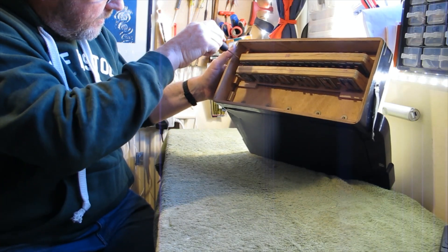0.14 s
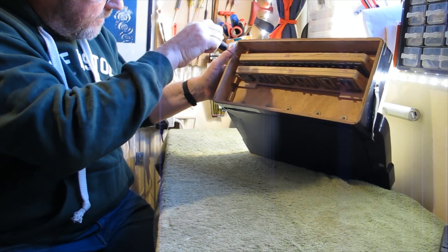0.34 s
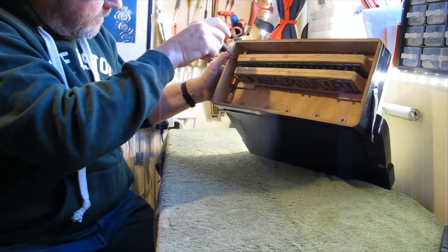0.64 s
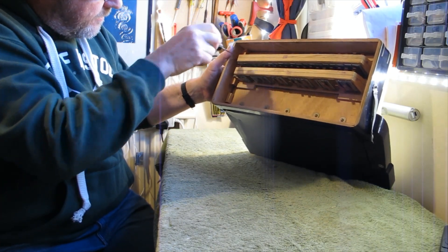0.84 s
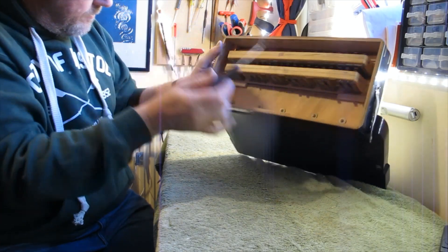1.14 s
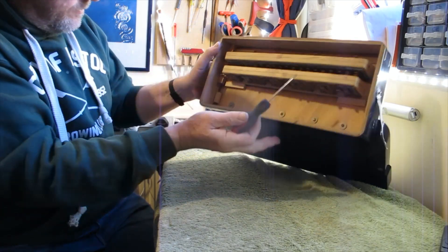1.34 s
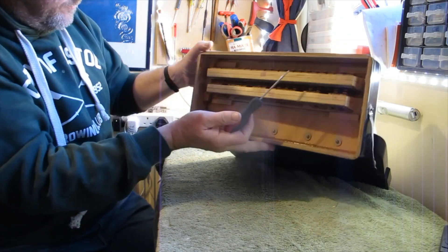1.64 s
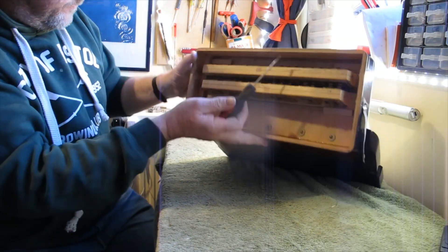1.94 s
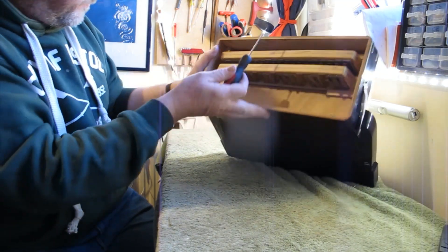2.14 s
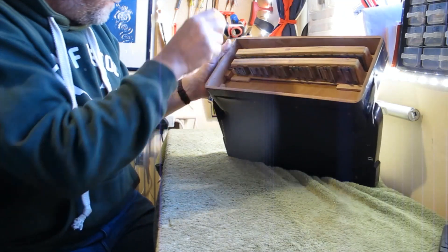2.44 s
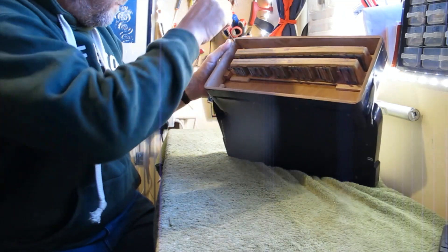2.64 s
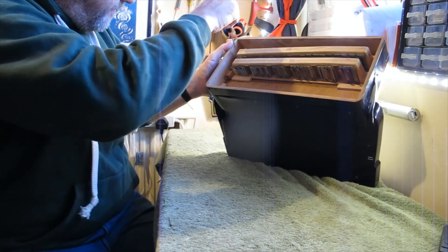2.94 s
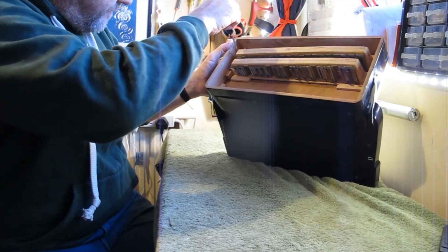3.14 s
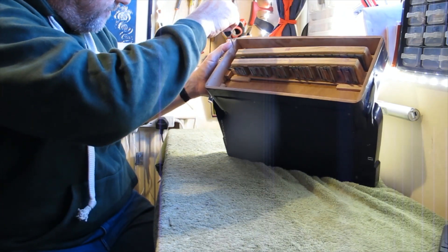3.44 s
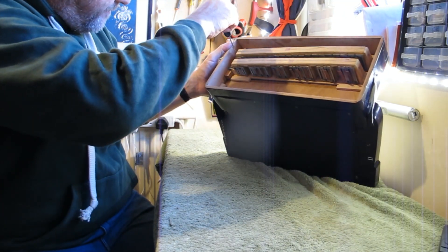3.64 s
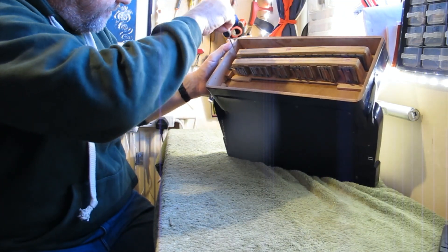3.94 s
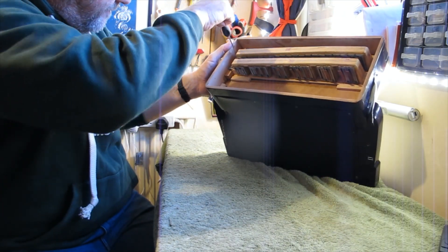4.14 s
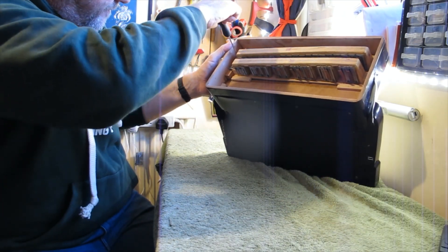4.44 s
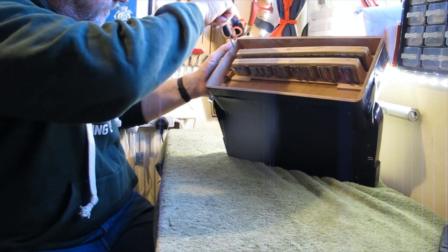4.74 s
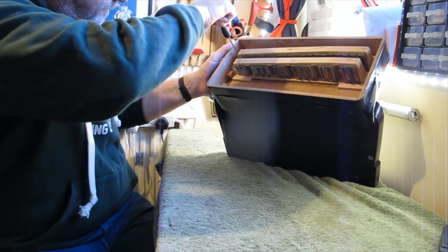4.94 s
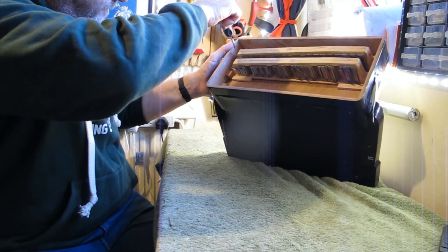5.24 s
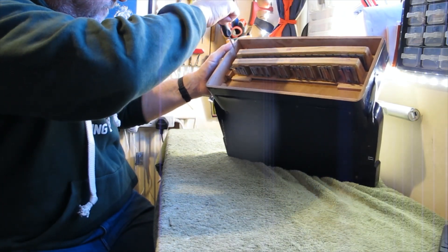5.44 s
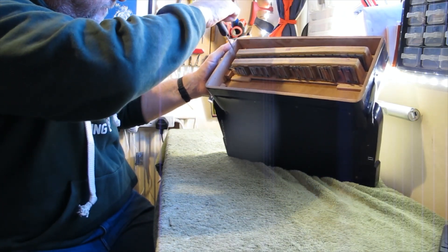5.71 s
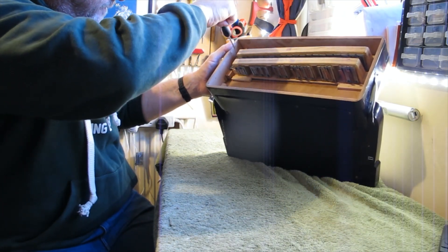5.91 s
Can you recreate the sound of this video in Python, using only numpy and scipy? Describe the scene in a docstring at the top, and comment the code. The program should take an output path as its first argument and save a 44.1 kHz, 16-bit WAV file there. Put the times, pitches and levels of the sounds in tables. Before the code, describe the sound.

A small screwdriver works a stiff screw in a wooden case, and the screw lets go with a loud snap. The hollow case bumps and drags on a cloth-covered bench amid light ticks, then comes another sharp click. Sparser knocks of steel on wood follow, with soft thumps and a few faint squeaks. A microphone to one side picks it up over the low rumble and hiss of a quiet workshop.

```python
"""A small screwdriver works a stiff screw at the corner of a wooden case in a quiet workshop. The screw
snaps loose, the case bumps and drags round on a cloth-covered bench, then the blade ticks and knocks,
ringing wood and steel; its tip squeaks in the slot. A camera to one side hears it over room rumble and
hiss; its gain control ducks after the loudest snap."""
import sys
import numpy as np
from scipy import signal
from scipy.fft import rfft, irfft, next_fast_len
from scipy.io import wavfile
from scipy.ndimage import uniform_filter1d, minimum_filter1d

SR = 44100
rng = np.random.default_rng(int(sys.argv[2]) if len(sys.argv) > 2 else 0)


def wav_out(sig):
    """Save sig, one row per channel (or a flat mono array), as 16-bit PCM at SR to the path in sys.argv[1]."""
    wavfile.write(sys.argv[1], SR, np.round(np.clip(np.atleast_2d(sig).T, -1, 1) * 32767).astype(np.int16))


N = 267687


def amp(db):
    return 10 ** (np.asarray(db) / 20)


def unit(x):
    return x / np.sqrt(np.mean(x ** 2) + 1e-20)


def curve_at(points, hz):
    """Interpolate (f/Hz, value) points over log frequency."""
    f, value = np.transpose(points)
    return np.interp(np.log(hz + 1), np.log(f + 1), value)


def add(mix, start_s, sound):
    part = mix[round(start_s * SR):][:len(sound)]
    part += sound[:len(part)]


def panned(left_minus_right_db):
    return amp(np.array([[.5], [-.5]]) * left_minus_right_db)


def room_tone():
    """Lumpy rumble, steady hiss and two faint whines; the noise differs at each microphone port."""
    spectrum = [(10, -4.5), (22, -3.5), (35, -8.5), (64, -19), (100, -2), (125, -14), (180, -15),
                (300, -22), (700, -22), (2100, -27), (3400, -29), (7000, -30), (9000, -33.5), (16000, -40)]  # noise: f/Hz, relative density/dB
    likeness = [(60, 0.92), (180, 0.59), (550, 0.04), (1650, 0.088), (4970, 0.03), (15000, 0.045)]  # f/Hz, left-right correlation
    balance = [(60, -9), (180, -2.5), (550, -3.5), (1650, -1.5), (4970, -0.5), (15000, -2)]  # f/Hz, left minus right/dB
    whines = [(2690, -81), (8802, -79)]  # steady tones: f/Hz, level/dB
    noise_db = -52.5
    frames, hz = N // 1024 + 5, np.fft.rfftfreq(4096, 1 / SR)
    a, b, c, d, lumps = rng.standard_normal((frames, 2049, 5)).T
    lumps = unit(uniform_filter1d(uniform_filter1d(lumps, 12, 0), 4, 1))
    wander_db = (0.07 + 2.0 / (1 + hz[:, None] / 300)) * lumps
    same = curve_at(likeness, hz)[:, None]
    left = a + 1j * b
    right = same * left + np.sqrt(1 - same ** 2) * (c + 1j * d)
    z = np.array([left, right]) * amp(curve_at(spectrum, hz)[:, None] + wander_db)
    z *= panned(curve_at(balance, hz))[:, :, None]
    noise = signal.istft(z, nperseg=4096, noverlap=3072)[1][:, :N]
    whine = sum(amp(db) * np.sin(2 * np.pi * f * np.arange(N) / SR) for f, db in whines)
    return amp(noise_db) * unit(noise) + whine


def workshop_echoes(x):
    """Sparse reflections of random sign, separate per port, each band dying at its own rate."""
    decay = [(300, 0.086), (1500, 0.12), (5000, 0.12), (12000, 0.069)]  # room: f/Hz, t60/s
    taps = np.zeros((2, 12000))
    delays = np.arange(200, 11960, 20) + rng.integers(0, 20, (2, 588))
    np.put_along_axis(taps, delays, rng.choice([-1., 1.], delays.shape), 1)
    hz, t, z = signal.stft(taps, SR, nperseg=128)
    tail = signal.istft(z * amp(-60 * t / curve_at(decay, hz)[:, None]), SR, nperseg=128)[1]
    return signal.fftconvolve(x[None], tail / np.linalg.norm(tail[0]), axes=1)[:, :N]


def cloth_slide():
    """Case, sleeves and hands slide on cloth; fibres catch and let go as patchy, grainy noise."""
    strokes = [(0, -61.5), (.4, -78), (.5, -48.5), (.62, -60), (.72, -78), (1.06, -56.5), (1.1, -50),
               (1.19, -45), (1.23, -48), (1.27, -60.5), (1.42, -61.5), (1.5, -48), (1.79, -51),
               (2.15, -49.5), (2.33, -53), (2.38, -48), (2.51, -51.5), (2.6, -51.5), (2.63, -60),
               (2.84, -57.5), (3, -71), (6.06, -67.5)]  # sliding envelope: t/s, relative level/dB
    scuffs = [(0.751, 0.0083, -42, -12.5), (.773, 0.0089, -36.5, 6.5), (1.358, 0.035, -54.5, -6),
              (1.51, 0.037, -45.5, -19), (1.561, 0.0088, -36.5, 6.5), (1.614, 0.0083, -42, -2),
              (1.706, 0.024, -40.5, 0), (1.832, 0.027, -53.5, 0), (1.931, 0.017, -48, -21),
              (2.04, 0.048, -52.5, -1.5), (2.117, 0.023, -43, -7), (2.192, 0.012, -41.5, -4),
              (2.237, 0.02, -37.5, -1), (2.3, 0.02, -51, -26), (2.887, 0.023, -47.5, -17),
              (3.688, 0.022, -42.5, -15.5), (4.41, 0.039, -50.5, -14.5), (4.626, 0.016, -43.5, -30),
              (4.968, 0.028, -50.5, 1), (5.06, 0.056, -60, -8), (5.67, 0.064, -55, -13),
              (5.8, 0.065, -57.5, -14)]  # brief swells: centre t/s, half width/s, relative level/dB, treble offset/dB
    spectrum = [(88, -37.5), (150, 4), (401, -15.5), (441, -18), (495, -14), (802, 0.5), (918, -2),
                (1160, 1.5), (1250, -5.5), (2100, -4), (2750, -6), (4600, -2), (7080, -4), (9300, -24),
                (15000, -41.5)]  # friction: f/Hz, relative density/dB
    grain_db, patch_db, stroke_treble_db = 1.9, 3.15, -2
    frames, hz = N // 64 + 5, np.fft.rfftfreq(256, 1 / SR)
    t = np.arange(frames) * 64 / SR
    grain = rng.standard_normal(N + 512)
    grain *= amp(grain_db * unit(uniform_filter1d(rng.standard_normal(N + 512), 60)))
    z = signal.stft(grain, nperseg=256, noverlap=192)[2][:, :frames]
    patches = unit(uniform_filter1d(uniform_filter1d(rng.standard_normal(z.shape), 4, 0), 25, 1))
    treble = np.clip(np.log2(hz / 2500 + 1e-9) + .5, 0, 1)[:, None]  # 0 to 1 over an octave
    force = amp(np.interp(t, *np.transpose(strokes)) + treble * stroke_treble_db)
    for centre_s, half_s, db, treble_db in scuffs:
        force += amp(db + treble * treble_db) * np.exp(-((t - centre_s) / half_s) ** 2)
    z = z * force * amp(curve_at(spectrum, hz)[:, None] + patch_db * np.clip(patches, -2, 2))
    return amp(8.5) * signal.istft(z, nperseg=256, noverlap=192)[1][:N]


def case_bumps():
    """The hollow case hits the bench: low boom, weaker and shorter overtone, dry thud."""
    bumps = [(.248, -45, 90), (0.497, -31, 109), (.759, -32.5, 106.5), (1.668, -26, 79.6),
             (1.705, -29.5, 122.4), (1.74, -33.5, 70.6), (1.776, -37, 48.4), (2.179, -39.5, 102),
             (2.575, -35, 142), (2.813, -27.5, 105), (3.669, -41, 114.5), (4.263, -41, 95.5),
             (4.389, -42, 136.5), (4.608, -38.5, 112), (4.96, -38, 118), (4.979, -38.5, 138),
             (5.049, -38, 98), (5.283, -42, 120), (5.801, -45.5, 109.5)]  # t/s, level/dB, f/Hz
    overtone_ratio, overtone_db, attack_s = 2.7, -13.0, 0.0023
    thud_hz, thud_db = (150, 445), -9.5
    boom_t60_s, thud_t60_s = 0.14, .05
    out, t = np.zeros(N), np.arange(SR // 2) / SR
    band = signal.butter(N=2, Wn=thud_hz, btype="band", fs=SR, output="sos")
    fall_db = -60 * t / boom_t60_s
    attack = 1 - np.exp(-t / attack_s)
    for start_s, db, hz in bumps:
        boom = amp(fall_db) * np.sin(2 * np.pi * hz * t)
        overtone = amp(overtone_db + 1.4 * fall_db) * np.sin(2 * np.pi * overtone_ratio * hz * t)
        noise = unit(signal.sosfilt(band, rng.standard_normal(len(t))))
        thud = amp(thud_db - 60 * t / thud_t60_s) * noise
        add(out, start_s, -amp(db) * attack * (boom + overtone + thud))
    return out


def tip_squeaks():
    """Stick-slip of the tip in the slot: steady pitch, wavering level."""
    squeaks = [(2.612, .07, 2620, -60), (4.937, .05, 4020, -55), (5.48, .025, 2100, -61),
               (3.25, .045, 1700, -59), (3.25, .05, 2550, -62)]  # t/s, length/s, f/Hz, level/dB
    out = np.zeros(N)
    for start_s, length_s, hz, db in squeaks:
        t = np.arange(round(length_s * SR)) / SR
        waver = 1 + 0.18 * unit(uniform_filter1d(rng.standard_normal(4000), 200))[:len(t)]
        fade = signal.windows.tukey(len(t), .25)
        add(out, start_s, amp(db) * waver * fade * np.sin(2 * np.pi * hz * t))
    return out


def ring(modes, spot_hz, max_t60_s, scatter_db, slope_db_oct):
    """Dying sines; modes near the touched spot's pitch answer most, the hand shortens the long ones."""
    t = np.arange(3000) / SR
    hz, db, t60_s = np.transpose(modes)[:, :, None]
    db = db + scatter_db[:len(hz), None] - slope_db_oct * abs(np.log2(hz / spot_hz))
    return (amp(db - 60 * t / np.minimum(t60_s, max_t60_s)) * np.sin(2 * np.pi * hz * t)).sum(0)


def blade_contacts():
    """Each contact is a blow and a burst of slips: wood and steel ring, with a dry crack at each spot."""
    # t/s, wood level/dB, wood spot f/Hz, steel level/dB, steel spot f/Hz, nominal hand-damped t60/s
    contacts = [(0.495, -13, 600, -36.5, 4350, 0.054), (0.4974, -12, 1674, -23, 4400, 0.069),
                (0.5024, -12, 580, -20, 4500, 0.027), (0.5065, -29, 930, -11, 5130, 0.13),
                (.513, -35, 1030, -18.5, 5700, 0.047), (.609, -40, 2260, -42.5, 3640, 0.037),
                (.77, -33.5, 2260, -34.5, 4250, 0.06), (1.105, -44.5, 2025, -56, 4350, 0.082),
                (1.25, -64, 1040, -47, 4790, .05), (1.315, -32, 1160, -38.5, 6440, 0.043),
                (1.34, -41, 1290, -45.5, 3860, 0.059), (1.354, -42.5, 1570, -41.5, 4350, 0.056),
                (1.393, -54, 2800, -48.5, 6750, 0.041), (1.453, -50, 2080, -55, 4000, 0.055),
                (1.493, -31.5, 2300, -34, 3980, .1), (1.551, -31.5, 1940, -19.5, 6200, 0.048),
                (1.596, -41.5, 1390, -61, 5000, 0.17), (1.62, -38, 1250, -49, 4400, 0.064),
                (1.67, -46, 1290, -56, 3700, 0.081), (1.69, -40.5, 1510, -36, 5540, 0.12),
                (1.718, -40, 1750, -39, 6940, 0.04), (1.888, -40.5, 3240, -31, 6620, .06),
                (1.98, -39.5, 1900, -61, 4430, 0.068), (2.085, -28.5, 1300, -41, 5300, 0.085),
                (2.089, -25, 1180, -38, 4470, 0.037), (2.104, -33.5, 1340, -49, 4700, 0.18),
                (2.178, -35.5, 1880, -19, 6100, .03), (2.204, -35.5, 1540, -42, 6700, 0.039),
                (2.221, -13.5, 2870, -12, 4200, 0.027), (2.2225, -19, 1830, -17, 3580, 0.019),
                (2.232, -33, 1700, -42, 6900, 0.073), (2.246, -36, 2570, -35, 4400, 0.027),
                (2.287, -40, 1430, -36.5, 4600, 0.057), (2.3, -34, 2300, -34.5, 4130, 0.04),
                (2.434, -45.5, 1580, -59, 6000, 0.055), (2.573, -36.5, 676, -54, 5190, 0.11),
                (2.81, -35.5, 707, -62, 3700, 0.041), (2.879, -46.5, 1880, -56, 4350, 0.05),
                (3.231, -41.5, 1580, -54, 3970, 0.18), (3.242, -41, 2100, -50, 3800, 0.025),
                (3.663, -29.5, 910, -33, 4720, 0.042), (3.67, -37, 2420, -27, 4540, 0.037),
                (3.839, -48.5, 1080, -69, 4500, 0.046), (3.911, -54.5, 1070, -70, 5750, 0.085),
                (4.01, -47, 1000, -56, 5500, 0.047), (4.263, -51.5, 643, -71, 5500, 0.097),
                (4.387, -38.5, 1600, -38, 4700, 0.031), (4.603, -25, 782, -43, 5060, 0.042),
                (4.661, -46, 1160, -56, 5500, 0.088), (4.9, -44, 900, -73, 3730, 0.078),
                (4.974, -49.5, 630, -51, 4630, .11), (5.278, -43.5, 860, -60, 4710, 0.25),
                (5.685, -36, 1900, -36.5, 4600, 0.032), (5.8, -54, 656, -57, 6000, 0.077),
                (5.969, -54.5, 990, -67, 7110, 0.099)]
    # modes: f/Hz, relative level/dB, t60/s
    walls = [(592, 2, .06), (700, -2, .035), (800, -2, .035), (925, 0, .04), (1067, 0, .04),
             (1190, -3, .03)]
    slats = [(1415, 0, .035), (1560, -2, .03), (1730, 0, .04), (1845, 0, .03), (2080, 0, .03),
             (2200, -2, .03), (2570, 0, .03), (2810, -3, .025), (3100, -4, .02), (3350, -4, .02)]
    screw = [(3700, -3, .02), (4020, -2, .025), (4360, 0, .03), (4745, 0, .03), (4950, -4, .02),
             (5125, 0, .03), (5290, -3, .025), (5630, -3, .025), (5770, -1, .03)]
    blade = [(6240, -6, .02), (6620, 0, .04), (6750, -2, .025), (7200, -5, .02), (7900, -14, .02),
             (8850, -8, .03), (10380, -10, .03)]
    # per body: mode falloff/(dB/octave), crack Q, crack re ring/dB, t60 factor, low-pass f / spot f
    responses = [(20.5, 2.3, -4.5, 1.046, 2.1), (26.0, 2.5, -1.5, 0.89, 1.4), (7.96, 0.99, -12, 0.73, 1.9)]
    bodies = [walls + slats, screw + blade, blade]  # wood, screw end, free blade
    free_blade_hz, slip_rise_s = 6150, 0.0018
    bands = [signal.butter(N=4, Wn=edges_hz, btype="band", fs=SR, output="sos")
             for edges_hz in [(470, 3500), (3300, 10800)]]  # wood, steel
    out, t = np.zeros(N), np.arange(2600) / SR
    for start_s, wood_db, wood_hz, steel_db, steel_hz, hand_t60_s in contacts:
        slips = rng.standard_normal(len(t)) * (1 - np.exp(-t / slip_rise_s))
        slips[0] = 2.28  # the blow
        scatter_db = 1.3 * rng.standard_normal((2, 16))
        for material, (db, hz) in enumerate([(wood_db, wood_hz), (steel_db, steel_hz)]):
            body = material + (hz > free_blade_hz)
            slope_db_oct, crack_q, crack_db, t60_factor, cutoff_ratio = responses[body]
            t60_s = t60_factor * np.clip(hand_t60_s, .008, .15)
            burst = slips * amp(-60 * t / (0.41 * t60_s))
            ringing = ring(bodies[body], hz, t60_s, scatter_db[material], slope_db_oct)
            tone = signal.fftconvolve(burst, ringing)[:len(t)]
            peak = signal.iirpeak(hz, crack_q, SR)
            crack = signal.lfilter(*peak, signal.lfilter(*peak, burst))
            knock = signal.sosfilt(bands[material], unit(tone) + amp(crack_db) * unit(crack))
            softness = signal.butter(N=2, Wn=cutoff_ratio * hz, fs=SR)  # a soft contact drives no highs
            knock = signal.lfilter(*softness, knock)
            max_rms = np.sqrt(uniform_filter1d(knock ** 2, 130).max())
            add(out, start_s, amp(db) * knock / max_rms)
    return out


def microphone_ports(x):
    """Bench sound reaches the two ports with unlike level and phase."""
    shading = [(200, 1), (700, 0), (2400, 1), (4400, 6.5), (5800, 3), (6800, -4), (8100, -8), (10500, -2),
               (15000, 1)]  # by the camera body: f/Hz, left minus right/dB
    lead = [(0, 0), (1700, -.2), (2900, -.7), (4300, -1.1), (5500, -2.3), (6550, -2.2), (8000, -.5),
            (10200, 0), (16000, 0)]  # f/Hz, left phase lead/rad
    size = next_fast_len(N + 2048)
    hz = np.fft.rfftfreq(size, 1 / SR)
    phase_rad = np.array([[.5], [-.5]]) * curve_at(lead, hz)
    response = panned(curve_at(shading, hz)) * np.exp(1j * phase_rad)
    return irfft(rfft(x, size) * response, size)[:, :N]


def scene():
    tool_pan, bench_pan = panned(-6.5), panned(-7)
    direct = tool_pan * blade_contacts() + bench_pan * (tip_squeaks() + cloth_slide())
    echoes = amp(-13.0) * bench_pan * workshop_echoes(direct.mean(0))
    return microphone_ports(direct + echoes + bench_pan * case_bumps()) + room_tone()


def record(dry):
    """Gain control ducks after a loud sound, holds and lets go; then input clipping and band limit."""
    threshold_db, max_over_db, duck_db_per_db = -16.5, 3.0, 3.07
    hold_s, smooth_s = .52, 0.042
    clip_level, cutoff_hz = .93, 15750
    power = abs(uniform_filter1d((dry ** 2).mean(0), 1000, origin=499))
    over_db = np.clip(10 * np.log10(power + 1e-12) - threshold_db, 0, max_over_db)
    hold = round(hold_s * SR)
    held_db = -minimum_filter1d(-over_db, hold, origin=(hold - 1) // 2)
    pole = np.exp(-1 / (smooth_s * SR))
    duck_db = duck_db_per_db * signal.lfilter([1 - pole], [1, -pole], held_db)
    clipped = np.clip(dry / amp(duck_db), -clip_level, clip_level)
    lowpass = signal.firwin(1023, cutoff_hz, window=("kaiser", 9), fs=SR)
    return signal.oaconvolve(clipped, lowpass[None], "same")


dry = scene()
out = record(dry)
wav_out(out)
```